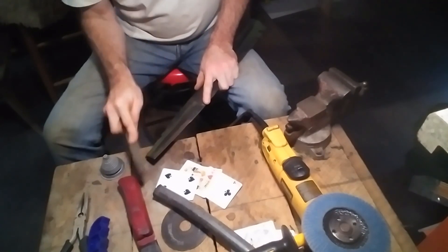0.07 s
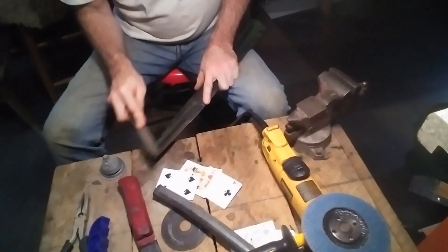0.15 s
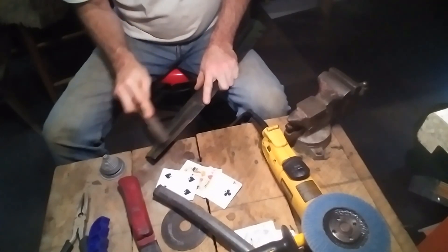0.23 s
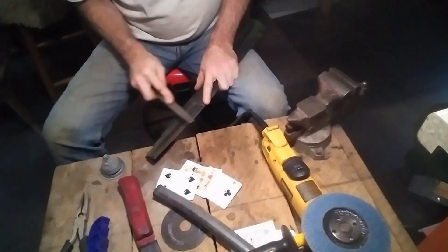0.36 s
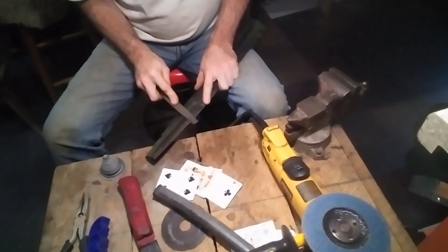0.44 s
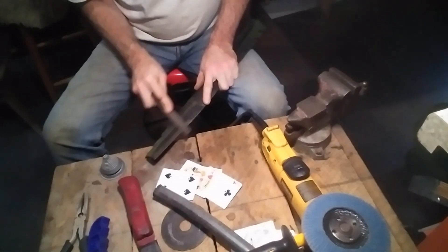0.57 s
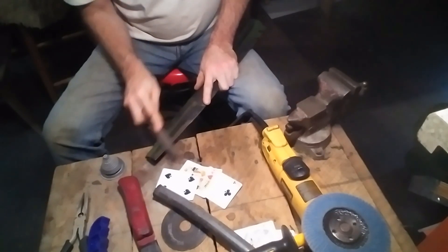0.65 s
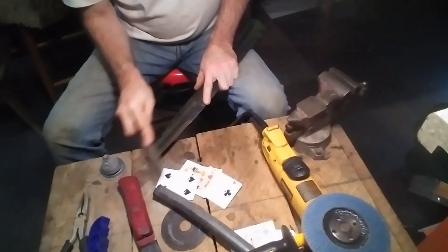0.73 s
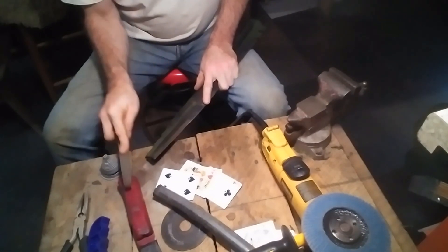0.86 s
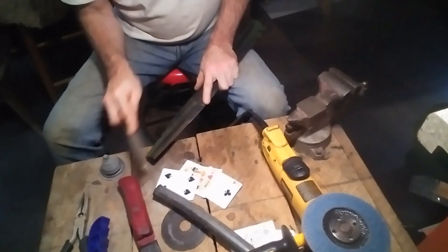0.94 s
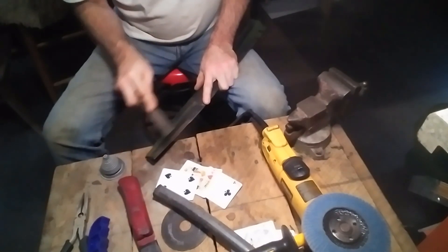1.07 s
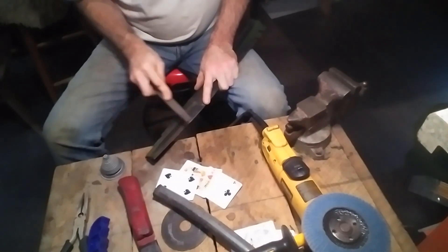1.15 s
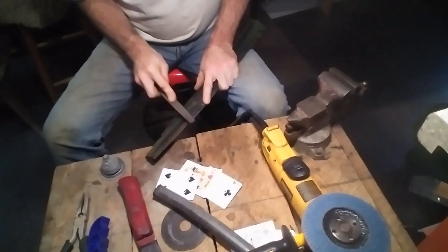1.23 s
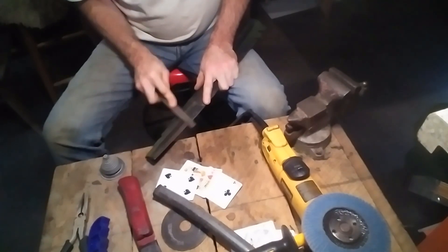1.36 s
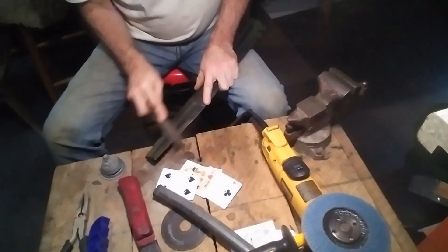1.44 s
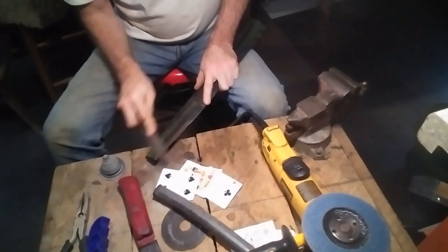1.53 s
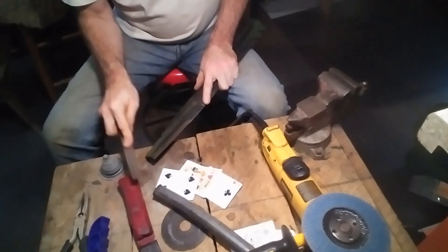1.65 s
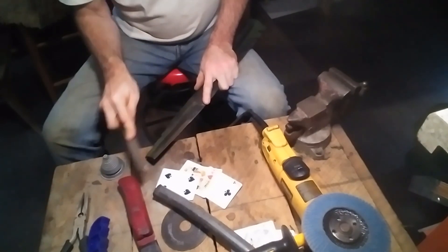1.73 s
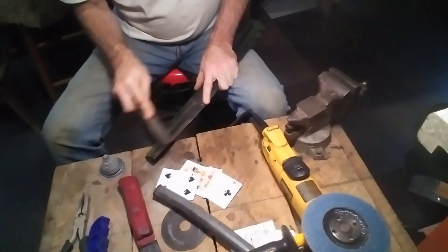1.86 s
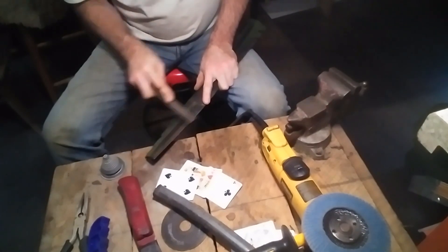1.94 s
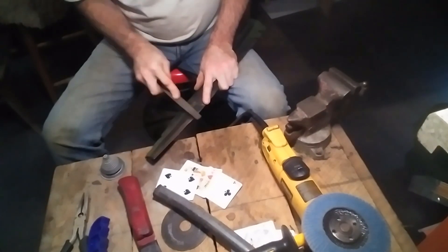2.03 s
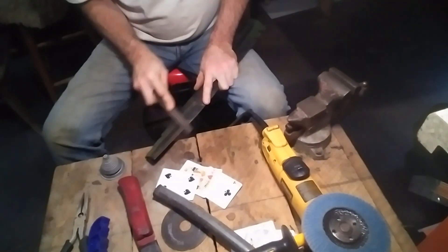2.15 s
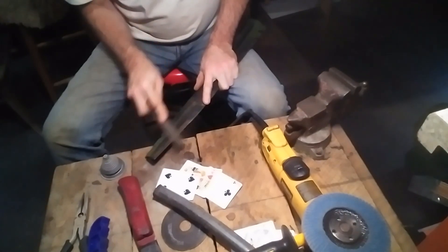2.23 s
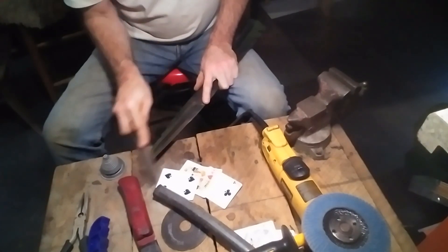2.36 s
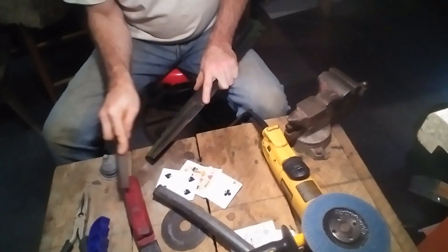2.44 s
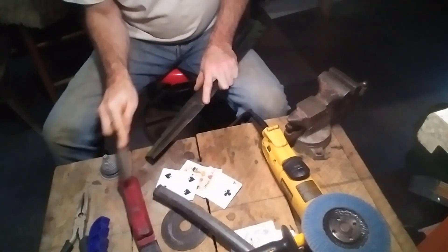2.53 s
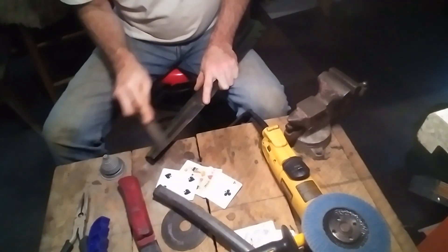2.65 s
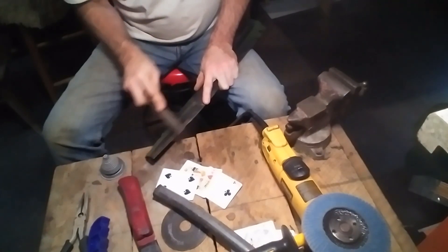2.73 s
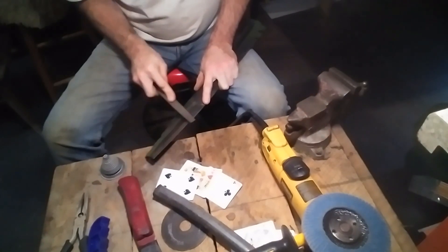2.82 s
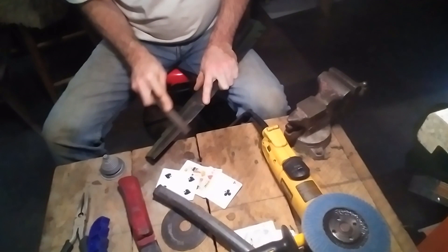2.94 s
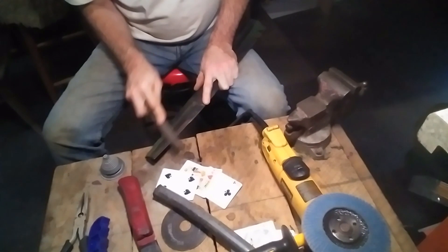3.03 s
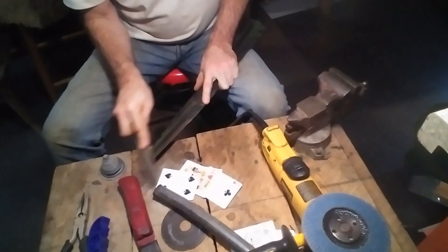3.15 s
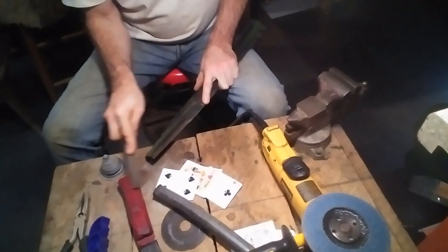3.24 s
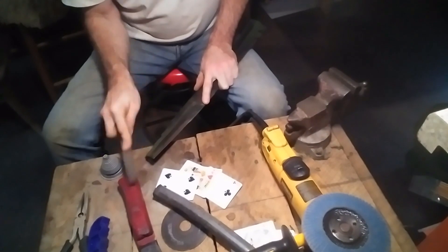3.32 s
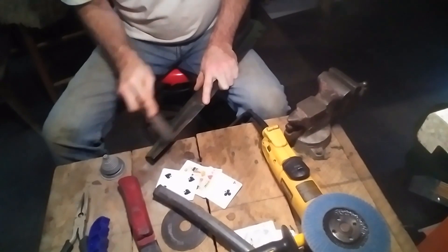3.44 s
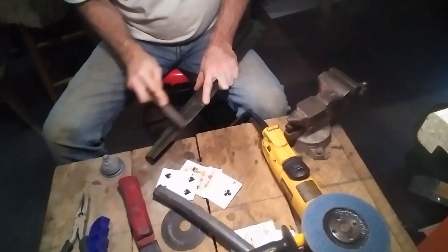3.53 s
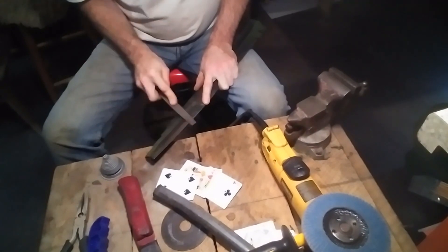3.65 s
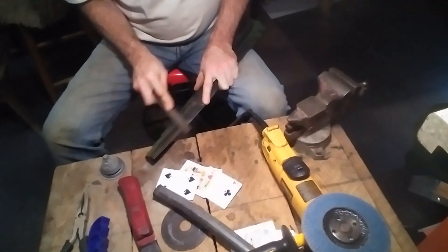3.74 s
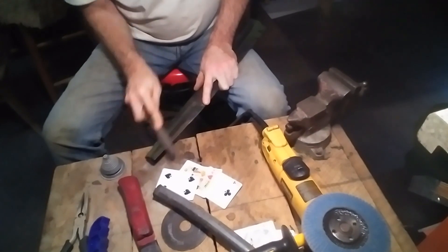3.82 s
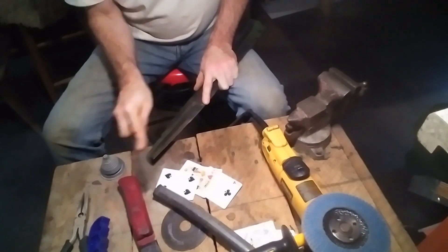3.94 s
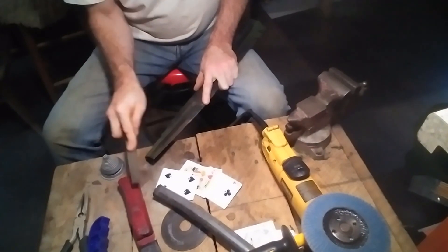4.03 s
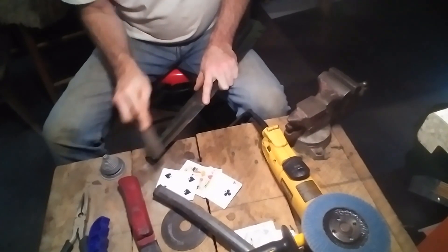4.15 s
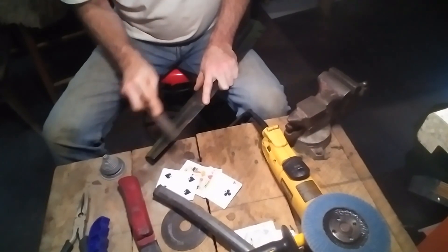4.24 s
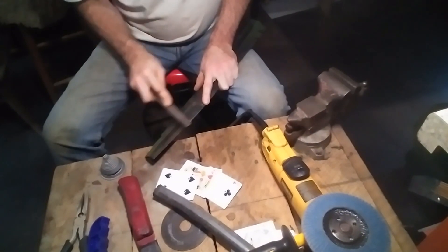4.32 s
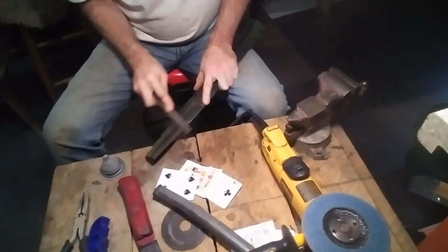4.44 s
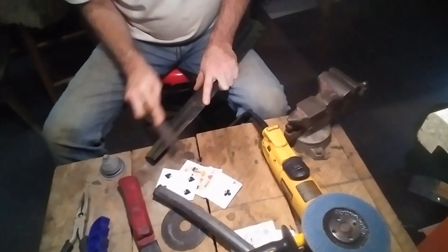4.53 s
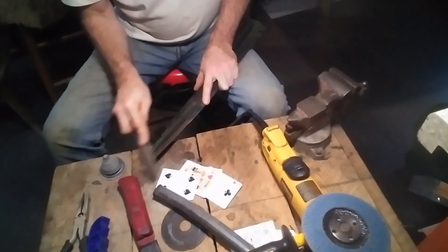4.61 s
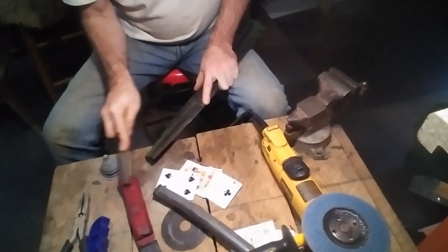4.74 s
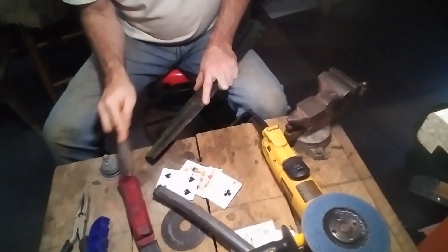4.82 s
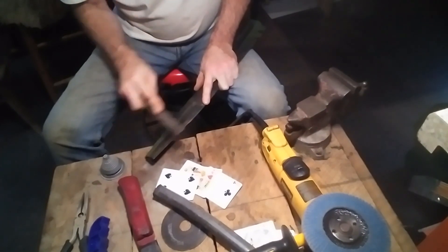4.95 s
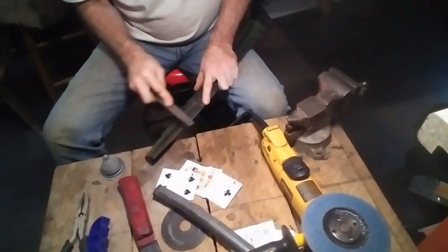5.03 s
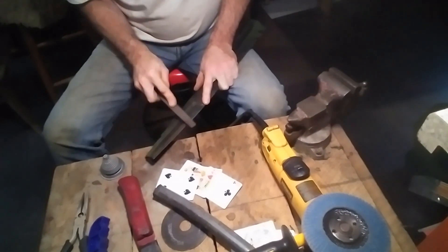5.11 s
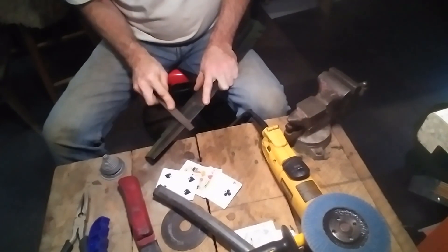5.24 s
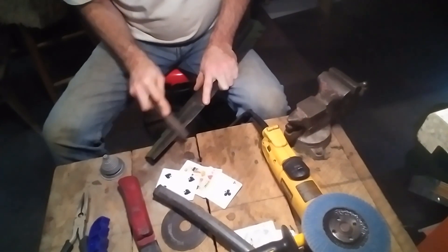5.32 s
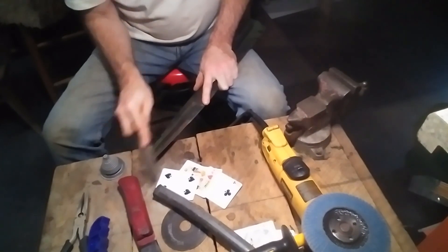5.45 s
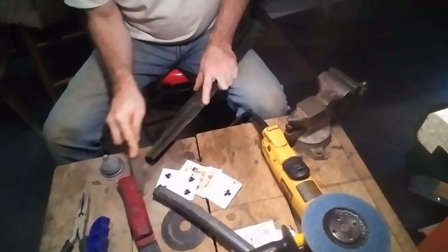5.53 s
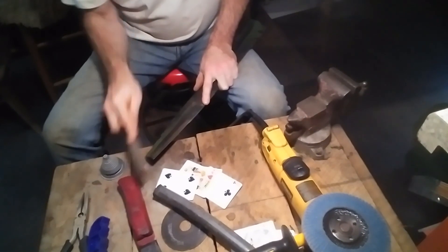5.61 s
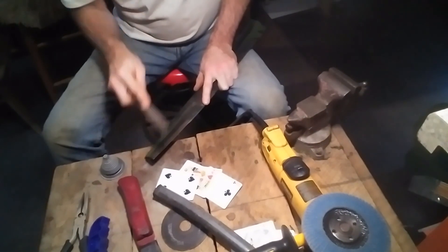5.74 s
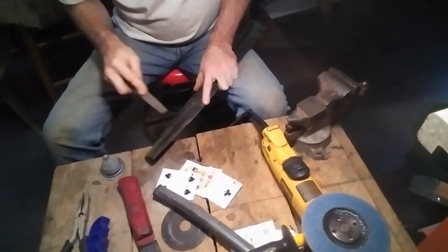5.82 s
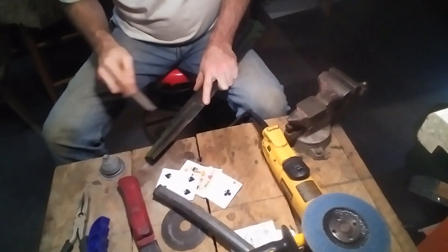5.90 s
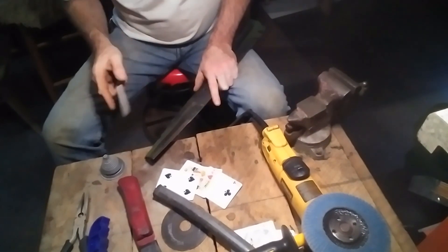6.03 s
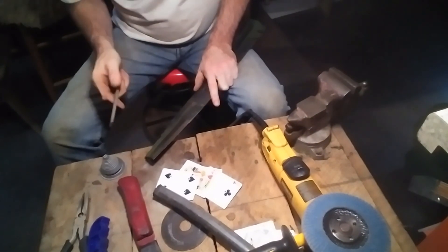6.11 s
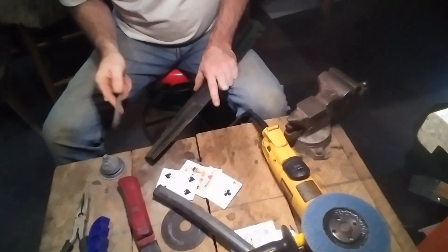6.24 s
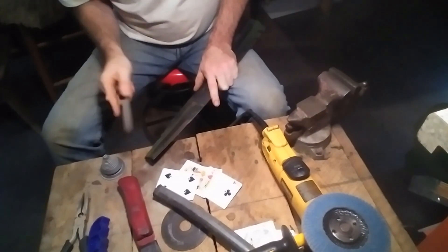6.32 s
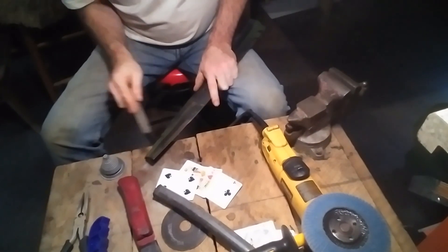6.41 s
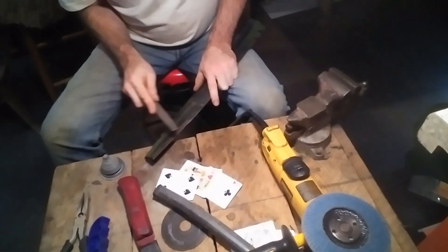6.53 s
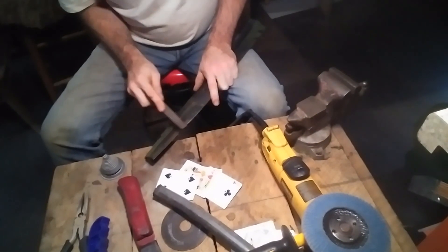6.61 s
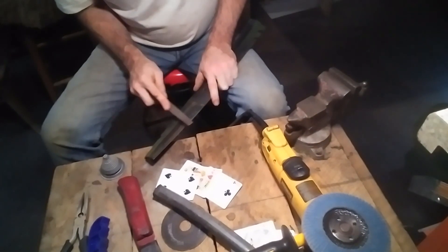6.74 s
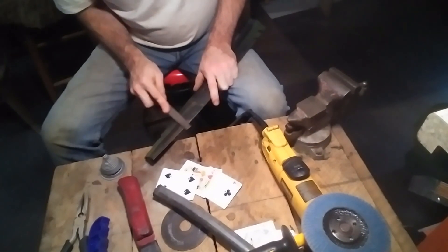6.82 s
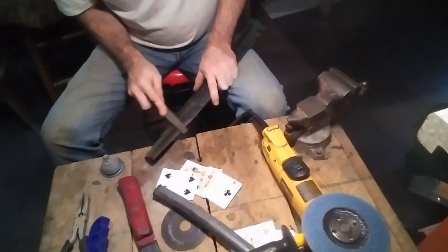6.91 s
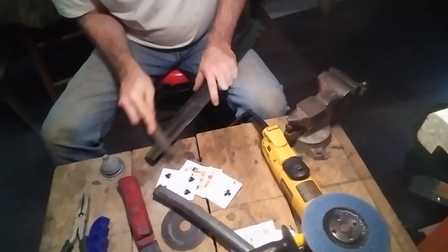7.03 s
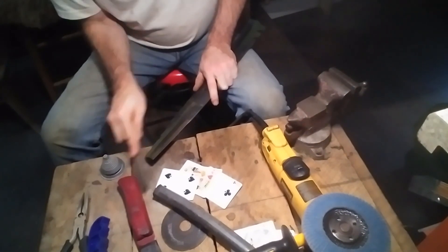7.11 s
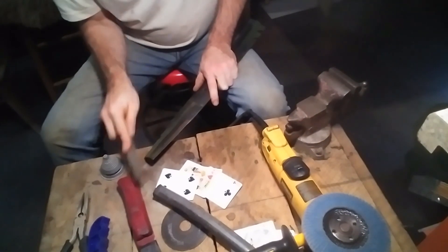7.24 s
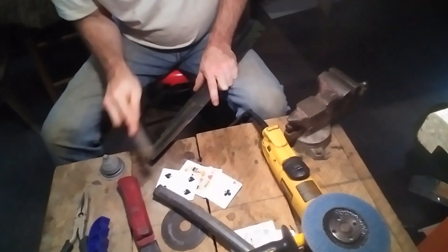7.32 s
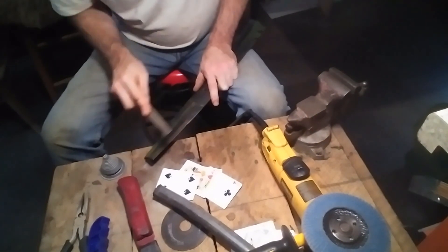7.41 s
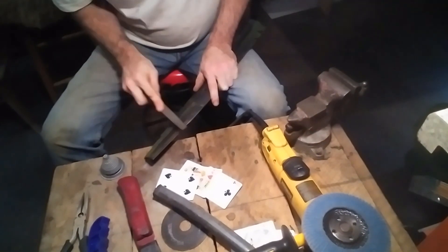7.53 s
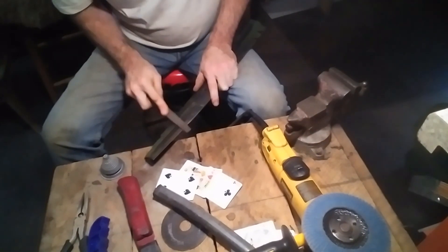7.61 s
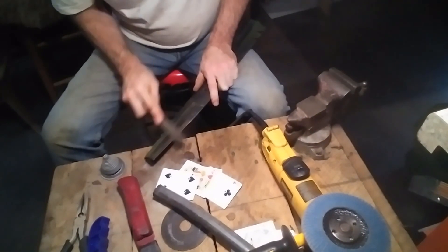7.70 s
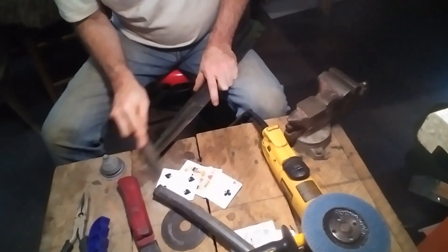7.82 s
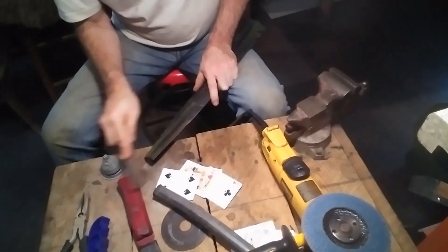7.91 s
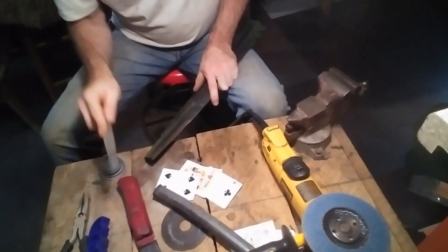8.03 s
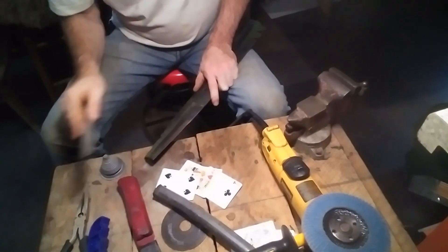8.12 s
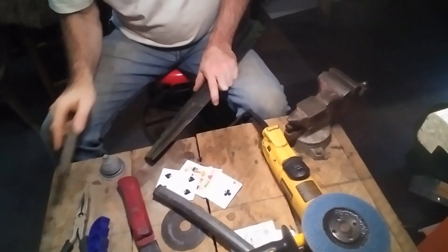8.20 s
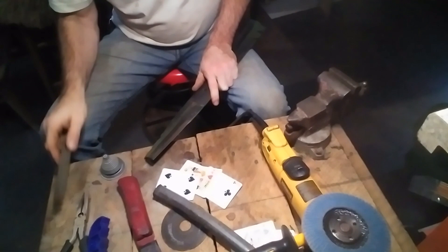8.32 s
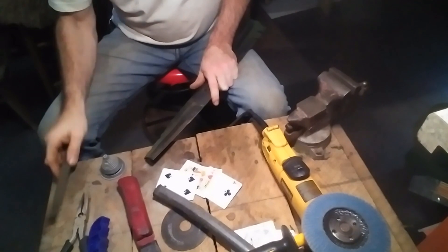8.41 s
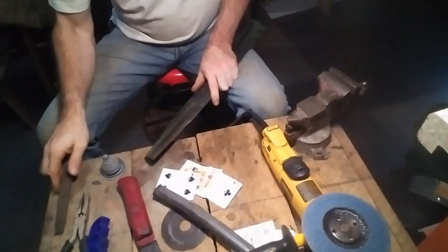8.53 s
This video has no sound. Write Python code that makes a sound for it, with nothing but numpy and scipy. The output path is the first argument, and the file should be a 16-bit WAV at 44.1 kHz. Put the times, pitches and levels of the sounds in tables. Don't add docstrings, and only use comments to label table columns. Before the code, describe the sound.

Short raspy filing strokes on steel clack, buzz and briefly sing, broken by two woody knocks, over faint hum and rustling clothes.

```python
import sys
import numpy as np
from scipy import signal
from scipy.fft import rfft, irfft, next_fast_len
from scipy.io import wavfile
from scipy.ndimage import uniform_filter1d

SR = 44100
rng = np.random.default_rng(int(sys.argv[2]) if len(sys.argv) > 2 else 0)


def decibels_to_gain(level_db):
    exponent = np.asarray(level_db, float) / 20
    return 10 ** exponent


def wav_record(signal):
    frames = np.transpose(np.atleast_2d(signal))
    bounded = np.clip(frames, -1, 1)
    quanta = np.round(bounded * 32767).astype(np.int16)
    wavfile.write(sys.argv[1], SR, quanta)


N = 377665
DITHER = 1e-18 * np.cos(np.arange(N))

# t/s, peak/dB, treble/dB, bass/dB, sizzle/dB
LANDINGS = [
    (0.638, -4, -10, 3.5, 2.5),
    (1.482, -3.5, -2.5, 4, -3.5),
    (2.26, -2, -22, -10, 0),
    (3.074, -3.5, -10, 2, 12.5),
    (3.837, -4, -20.5, 1.5, -7.5),
    (4.583, -1, -5, -1.5, 10.5),
    (5.362, -4.5, -26.5, 5.5, 8),
    (7.007, -5, -5, 6, -12),
    (7.786, -1.5, 0, 6, -18),
]
# t/s, peak/dB, brightness/dB, bite of the teeth/dB
JOLTS = [(0.1444, -0.5, -31, -42), (0.8992, -13, -4, -22.5), (0.9478, -4, 2, -14),
         (1.6328, -24.5, 12.5, -24.5), (1.738, -21, -6, -23), (1.7474, -8, 0.5, -14),
         (1.7666, -6.5, 2.5, -18), (1.7768, -7, 3, -28), (2.341, -19, -3, -31), (2.4, -13, -6, -22),
         (2.558, -14.5, -2, -24), (3.1313, -3, -5, -32), (3.1828, -9, 1.5, -21), (3.2045, -15.5, -0.5, -23),
         (3.2556, -6, -16, -30.5), (3.926, -12, 0, -29.5), (3.9786, -34.5, 14, -20),
         (4.0213, -13.5, 8.5, -25), (4.045, -31, -4, -38), (4.093, -15, 2, -23.5),
         (4.1252, -9.5, -8.5, -22.5), (4.7415, -9.5, 9, -24), (4.791, -25.5, 13, -20.5),
         (4.8379, -11, 2, -20), (5.467, -25.5, 5.5, -25), (5.497, -20.5, -1, -29),
         (5.5731, -14, 8.5, -22.5), (5.649, -22, 7, -20.5), (5.663, -13, -5, -27), (5.674, -5, -5.5, -17.5),
         (5.7205, 0.5, -6, -14), (5.729, -9, -18, -19), (7.0813, -13, -5, -32.5),
         (7.1516, -24.5, -0.5, -37), (7.1626, -11, -1, -44), (7.249, -26, 3, -29.5),
         (7.261, -9.5, -6.5, -22.5), (7.281, -5.5, 2, -33), (7.2973, -4, 3, -28.5),
         (7.306, -8, -10.5, -34.5), (7.3585, 1.5, -7, -13.5), (7.367, -10, -21, -29),
         (7.8756, -15, -3, -25)]
# t/s, peak/dB
SLIPS = [
    (2.575, -17),
    (5.723, -5),
    (7.360, -3),
]
# f/Hz, width/Hz, level/dB
LOW_MODES = [(1308, 45, 1), (1348, 40, 0), (1465, 50, -2), (1600, 60, -5), (1760, 80, -3), (1905, 60, -2),
             (2010, 60, -7), (2350, 70, -9)]
# f/Hz, width/Hz, level/dB
HIGH_MODES = [(2526, 120, -3.5), (3350, 29, -4), (3531, 60, -1.5), (4008, 70, 0), (4370, 110, -9),
              (4740, 210, -11), (5100, 200, -21.5), (5810, 190, -15.5), (6320, 34, -11.5), (6840, 58, -6.5),
              (7377, 55, -2), (8104, 83, -5), (8140, 100, -5), (10180, 270, -22)]
# f/Hz, width/Hz, level/dB
BODY_MODES = [(645, 24, -4), (677.6, 57, -7), (776, 15, -7.5), (894.8, 41, -1.5), (939.4, 73, -5),
              (1060, 54, -6)]
# t/s, level/dB
PRESSURE = [
    [(0.0, -24), (0.06, -29), (0.07, -20.5), (0.136, -27), (0.146, -20), (0.16, -43)],
    [(0.67, -34), (0.696, -37), (0.724, -28.5), (0.956, -23), (0.96, -64)],
    [(1.51, -63), (1.544, -35), (1.638, -25), (1.74, -25), (1.778, -29.5), (1.785, -29)],
    [(2.285, -28.5), (2.293, -29), (2.335, -25), (2.385, -30.5), (2.523, -28), (2.575, -36)],
    [(3.1, -25), (3.113, -33), (3.221, -33), (3.259, -21), (3.263, -28), (3.37, -28.5)],
    [(3.865, -39), (3.873, -42), (3.919, -31), (4.015, -31.5), (4.019, -28), (4.135, -30.5)],
    [(4.61, -34), (4.646, -34.5), (4.728, -26.5), (4.746, -27.5), (4.77, -28.5), (4.845, -28)],
    [(5.39, -43.5), (5.458, -41.5), (5.584, -27), (5.646, -28), (5.674, -17), (5.7, -49)],
    [(7.035, -48), (7.143, -44.5), (7.161, -35.5), (7.253, -25.5), (7.303, -21), (7.345, -34)],
    [(7.813, -34.5), (7.856, -33.5), (7.922, -29.5), (7.938, -27), (8.062, -27.5), (8.065, -27.5)],
]
# start of braking t/s, top speed/(teeth/s), slowest/(teeth/s), at the tip/(teeth/s)
SPEEDS = [(0.03, 1730, 1040, 1700), (0.825, 1890, 1150, 1300), (1.654, 1970, 1150, 1850),
          (2.415, 1650, 1250, 1600), (3.205, 1700, 1180, 1350), (3.984, 1880, 1080, 1420),
          (4.712, 1770, 1200, 1480), (5.506, 1530, 1320, 1400), (7.08, 1910, 1530, 1360),
          (7.93, 1550, 1300, 1700)]
# buzz while fast/dB, buzz while slow/dB, blade body/dB, bench/dB
SHARES = [(3, 0.5, -3, -16), (-1.5, -6, -7.5, -19), (-0.5, -5.5, -17.5, -20), (0, -0.5, -1.5, -17),
          (8.5, 0, -1, -17), (2, -1, -2.5, -19.5), (1.5, -2, -2, -16.5), (5, -3, -8.5, -21),
          (14, 0, -4.5, -17), (1.5, -1, -6, -18.5)]


def rms_one(x):
    return x / np.sqrt(np.mean(x ** 2) + 1e-20)


def passed(x, hz, kind, order=2):
    sections = signal.butter(order, hz, kind, fs=SR, output="sos")
    return signal.sosfilt(sections, x + DITHER[:np.shape(x)[-1]])


def at_hz(points, hz):
    points = np.array(points)
    return np.interp(np.log(hz + 1), np.log(points[:, 0]), points[:, 1])


def colour(x, spectrum):
    cepstrum = irfft(at_hz(spectrum, np.linspace(0, SR / 2, 2049)) * np.log(10) / 20)
    cepstrum[1:2048] *= 2
    cepstrum[2049:] = 0
    kernel = irfft(np.exp(rfft(cepstrum)))
    return signal.oaconvolve(x, kernel / np.sqrt(np.sum(kernel ** 2)))[:N]


def drift(rate, swing_db=None, stepped=False):
    knots_per_s = 200
    knots = rng.standard_normal(int(N / SR * knots_per_s) + 2)
    smooth = rms_one(signal.lfilter([1], [1, -np.exp(-2 * np.pi * rate / knots_per_s)], knots))
    if swing_db is not None:
        smooth = decibels_to_gain(swing_db * smooth)
    if stepped:
        return np.repeat(smooth, SR // knots_per_s + 1)[:N]
    return np.interp(np.arange(N) * (knots_per_s / SR), np.arange(len(knots)), smooth)


def modes(force, table, patchy_db, widen=1):
    out, power = 0, 0
    for k, (hz, width, level_db) in enumerate(table):
        r = np.exp(-np.pi * width * widen / SR)
        drive = force * drift(1.3, patchy_db, stepped=True) + DITHER
        top = np.array([1, 0, -1]) * decibels_to_gain(level_db) * (1 - r * r) / 2
        bottom = [1, -2 * r * np.cos(2 * np.pi * hz / SR), r * r]
        out = out + (-1) ** k * signal.lfilter(top, bottom, drive)
        power += decibels_to_gain(level_db) ** 2 * (1 - r * r) / 2
    return out / np.sqrt(power)


def grains(per_s, spread_db):
    sizes = decibels_to_gain(spread_db * np.minimum(rng.exponential(1, N), 5)) * np.sign(rng.random(N) - .5)
    return rms_one(sizes * (rng.random(N) < per_s / SR))


def bursts(events, rise_s, fall_s, column=None):
    t, out = np.arange(round(.04 * SR)) / SR, np.zeros(N)
    shape = (1 - np.exp(-t / rise_s)) * np.exp(-t / fall_s)
    for row, noise in zip(events, rng.standard_normal((len(events), len(t)))):
        i = round(row[0] * SR)
        trim_db = row[column] if column else 0
        out[i:i + len(t)] += decibels_to_gain(row[1] + trim_db) * shape * noise
    return out


def blows(events, column=None, late_s=0):
    out = np.zeros(N)
    for row in events:
        trim_db = row[column] if column else 0
        out[round((row[0] + late_s) * SR)] = decibels_to_gain(row[1] + trim_db)
    return out


def swells(events, column, rise_s, fall_s):
    marks, t = np.zeros(N), np.arange(round(.1 * SR)) / SR
    for row in events:
        marks[round(row[0] * SR)] = decibels_to_gain(row[column])
    return signal.oaconvolve(marks, (1 - np.exp(-t / rise_s)) * np.exp(-t / fall_s))[:N]


def pressure_db(off_db):
    edge_s, points = .025, []
    for stroke in PRESSURE:
        points.append((stroke[0][0] - edge_s, off_db))
        points += [(row[0], row[1]) for row in stroke]
        points.append((stroke[-1][0] + edge_s, off_db))
    return np.interp(np.arange(N) / SR, *np.transpose(points))


def stroke_corners():
    brake_s = 0.055
    return np.array([(stroke[0][0], speed[0], speed[0] + brake_s, stroke[-1][0])
                     for stroke, speed in zip(PRESSURE, SPEEDS)])


def since_touch():
    early_s = .05
    t, starts = np.arange(N) / SR, stroke_corners()[:, 0] - early_s
    starts[0] = -1
    return np.maximum(t - starts[np.searchsorted(starts, t) - 1] - early_s, 0)


def fast_then_slow(fast, slow, tip):
    values = np.transpose([fast, fast, slow, tip])
    return np.interp(np.arange(N) / SR, stroke_corners().ravel(), values.ravel())


def tooth_rate():
    start_teeth_per_s, speed_up_s = 1050, .035
    _, top, slowest, tip = np.transpose(SPEEDS)
    cruise = fast_then_slow(top, slowest, tip)
    return cruise + (start_teeth_per_s - cruise) * np.exp(-since_touch() / speed_up_s)


def pressed(fast_db, slow_db):
    return decibels_to_gain(pressure_db(off_db=-93.5) + fast_then_slow(fast_db, slow_db, slow_db))


def shaken(share_db, fast_db, landing_db, landing_s, jolt_db):
    slip_db = -19
    steady = pressed(share_db + fast_db, share_db)
    landing = decibels_to_gain(landing_db) * swells(LANDINGS, column=1, rise_s=0.0036, fall_s=landing_s)
    jolt = decibels_to_gain(jolt_db) * swells(JOLTS, column=3, rise_s=0.014, fall_s=0.016)
    slip = decibels_to_gain(jolt_db + slip_db) * swells(SLIPS, column=1, rise_s=0.0015, fall_s=0.0083)
    return steady + landing + jolt + slip


def rustle():
    swishes = [(.28, -77, .1, .1), (.508, -58.5, .1, 0.11), (.63, -60, 0.063, 0.081),
               (1.129, -60, 0.15, 0.071), (1.398, -57, 0.017, 0.96), (2.038, -59, 0.35, 0.11),
               (2.249, -69, 0.025, 0.092), (2.759, -57, 0.38, 0.16), (3.008, -60.5, 0.047, 0.34),
               (3.49, -61, 0.14, 0.25), (3.626, -64, 0.36, 0.086), (3.829, -53, 0.16, 0.084),
               (4.45, -56, 0.17, 0.38), (5.074, -54, 0.069, 0.2), (5.3, -55.5, 0.36, 0.98),
               (5.989, -78, 0.11, .25), (6.094, -58.5, 0.022, 0.18), (6.244, -64, 0.47, 0.083),
               (6.351, -59.5, 0.035, 0.1), (6.47, -58.5, 0.02, 0.39), (6.636, -81, 0.24, 0.087),
               (6.792, -56.5, 0.15, 0.29), (7.001, -63, 0.048, 0.064), (7.58, -59, 0.082, 0.11),
               (7.712, -62.5, 0.33, 0.028), (7.781, -46, 0.045, 0.047), (8.36, -65.5, 0.037, .4),
               (8.5, -62.5, 0.13, 0.64)]
    t = np.arange(0, N / SR + .01, .002)
    gain = decibels_to_gain(-85)
    for s, db, swell, fade in swishes:
        gain = gain + decibels_to_gain(db - 25 * np.maximum((s - t) / swell, (t - s) / fade))
    return np.interp(np.arange(N) / SR, t, gain)


def background():
    # f/Hz, level/dB (per Hz)
    hum_colour = [(15, -36.5), (25, -10), (102, 3), (217, -5.5), (373, 3.5), (476, -6), (560, -5.5),
                  (2350, -15), (3920, -19), (5000, -31.5), (6740, -23), (14800, -24), (16000, -30.5)]
    # f/Hz, level/dB (per Hz)
    cloth_colour = [(88, -49.5), (150, -11), (270, -6.5), (345, -5.5), (516, -10.5), (832, -12),
                    (1750, -21), (5140, -38.5), (6000, -39.5), (7800, -65.5), (13200, -120)]
    # t/s, peak/dB
    ticks = [
        (1.396, -46),
        (1.454, -51),
        (3.8, -52),
        (6.093, -58),
        (6.465, -57),
        (6.756, -64),
        (7.755, -43),
    ]
    hum = decibels_to_gain(-64) * colour(rng.standard_normal(N), hum_colour)
    swish = grains(6400, spread_db=2.5) * rustle() * decibels_to_gain(2.0 * drift(15))
    snaps = decibels_to_gain(-6.5) * passed(bursts(ticks, .0003, 0.008), 350, "high")
    snaps = passed(snaps, 4200, "low", order=4)
    return passed(hum, 46, "high", order=4) + colour(swish, cloth_colour) + snaps


def grit():
    # f/Hz, level/dB (per Hz)
    rasp_colour = [(1120, -28), (1900, -2.5), (2170, -11), (2760, 1.5), (3050, -13), (3880, -2), (4130, -9),
                   (4280, -3), (4900, -9), (7430, -8.5), (9540, -18), (13400, -41), (16000, -35.5)]
    edges_hz = np.geomspace(1500, 16500, 10)
    force = grains(16000, spread_db=2.0) * decibels_to_gain(pressure_db(off_db=-89.0) - 0.43 + 2.0 * drift(30))
    hiss, mottled = colour(force, rasp_colour), 0
    for low, high in zip(edges_hz, edges_hz[1:]):
        mottled = mottled + passed(hiss, [low, high], "band") * drift(7.9, swing_db=2.0, stepped=True)
    return decibels_to_gain(-1.0) * mottled + decibels_to_gain(-6.5) * modes(force, HIGH_MODES, patchy_db=3.0, widen=2)


def teeth():
    rate = tooth_rate() * (1 + .08 * drift(120))
    turns = np.cumsum(rate) / SR
    push = np.cos(2 * np.pi * turns) * decibels_to_gain(2.5 * drift(70))
    wear = rms_one(passed(rng.standard_normal(N), 380, "low"))
    uneven = wear * np.sin(2 * np.pi * turns)
    rough = 1.6 * grains(6000, spread_db=2.0) + 1.2 * uneven
    ringing = modes(push + rough, LOW_MODES, patchy_db=7.5, widen=1.4)
    sound = ringing + decibels_to_gain(1.5) * (push + .6 * uneven)
    even = np.sqrt(uniform_filter1d(sound ** 2, size=1500) + 1e-12)
    fast_db, slow_db, _, _ = np.transpose(SHARES)
    catch = decibels_to_gain(-8.5 * np.exp(-since_touch() / 0.032) - 4.0)
    bite = swells(JOLTS, column=3, rise_s=0.0013, fall_s=0.0036)
    return sound / even * (catch * pressed(fast_db, slow_db) + bite)


def rumble():
    # f/Hz, width/Hz, level/dB
    bench_modes = [(165, 24, -3.5), (255, 74, -6), (320, 87, -1), (432, 64, -2.5), (558, 76, -0.5)]
    shake = rng.standard_normal(N) * decibels_to_gain(-0.5 + 2.0 * drift(14))
    _, _, body_db, bench_db = np.transpose(SHARES)
    bench_gain = shaken(bench_db, fast_db=-4, landing_db=-29.5, landing_s=0.018, jolt_db=-19.5)
    body_gain = shaken(body_db, fast_db=-7, landing_db=-23, landing_s=0.018, jolt_db=-9.5)
    bench = modes(shake * bench_gain, bench_modes, patchy_db=2.5)
    body = modes(shake * body_gain, BODY_MODES, patchy_db=1.2, widen=1.5)
    return passed(bench, 1200, "low") + passed(body, 1500, "low")


def clacks():
    # f/Hz, level/dB (per Hz)
    crack_colour = [(120, -45.5), (200, -12.5), (1680, -3.5), (3250, -2.5), (3900, 1.5), (4860, -17),
                    (5730, -4), (6880, -17.5), (7540, -9.5), (9580, -25), (16000, -40)]
    # clang/dB, bounce after/s, bounce/dB
    rebounds = [(15.5, 0.0031, -4.5), (5.5, .006, -6.5), (-20, .007, -6), (-4.5, 0.0071, -2.5),
                (-5, 0.0041, 0), (1, 0.0034, -7), (-2.5, 0.0063, -7), (-17.5, .004, -3.5), (17, 0.003, -2)]
    jolts = [(s, db, bright, -0.5, 2.3 * bright, bright - 2.5) for s, db, bright, _ in JOLTS]
    first = [row + (clang_db,) for row, (clang_db, _, _) in zip(LANDINGS, rebounds)]
    second = [(row[0] + after, row[1] + db) + row[2:] for row, (_, after, db) in zip(first, rebounds)]

    def force(column=None):
        landing = bursts(first, 0.0003, 0.0026, column) + bursts(second, 0.0007, 0.0027, column)
        return decibels_to_gain(-8.5) * landing + decibels_to_gain(-16.0) * bursts(jolts, 0.0012, 0.0046, column)

    crack = passed(colour(force(), crack_colour), 5300, "low")
    clang = decibels_to_gain(-9.0) * passed(force(column=5), [3400, 4450], "band")
    sizzle = passed(colour(force(column=4), crack_colour), 6900, "high")
    high = modes(force(column=2), HIGH_MODES, patchy_db=2, widen=3.5)
    low = modes(force(column=3), LOW_MODES + BODY_MODES, patchy_db=1.5, widen=1.6)
    struck = crack + decibels_to_gain(-2.5) * passed(low, 6700, "low")
    struck = signal.lfilter(*signal.iirnotch(1155, 4.0, fs=SR), struck)
    return struck + clang + sizzle + high


def chatter():
    # t/s, length/s, f/Hz, level/dB
    songs = [(0.742, 0.051, 1940, -31.5), (1.617, 0.043, 1904, -39), (1.68, 0.1, 167, -48.5),
             (2.333, 0.053, 1817, -29), (2.365, 0.051, 1453, -32), (2.395, 0.03, 1940, -29),
             (3.102, 0.099, 165, -58.5), (3.189, 0.023, 1864, -27.5), (3.26, 0.047, 1006, -25.5),
             (3.922, 0.023, 1790, -31), (3.95, .11, 162, -54), (3.966, 0.014, 1910, -26),
             (4.04, 0.013, 1337, -25), (4.121, 0.011, 1410, -27), (4.688, 0.043, 1898, -28.5),
             (5.658, 0.028, 1425, -24), (7.251, 0.039, 1332, -21.5), (7.286, .03, 1358, -15),
             (7.323, .024, 1329, -24.5)]
    out, throb, waver = np.zeros(N), drift(40, swing_db=2.0), 1 + .02 * drift(60)
    for s, length, hz, db in songs:
        t = np.arange(round(length * SR)) / SR
        start = round(s * SR)
        part = slice(start, start + len(t))
        edges = np.clip(np.minimum(t, length - t) / 0.0029, 0, 1)
        tone = np.sin(2 * np.pi * hz * np.cumsum(waver[part]) / SR)
        out[part] += decibels_to_gain(db) * edges * throb[part] * tone
    return out


def knocks():
    # f/Hz, width/Hz, level/dB
    spring_modes = [(500, 40, -3), (1000, 80, -8), (1790, 70, -5), (2580, 26, 0), (2750, 24, -3)]
    # t/s, peak/dB, ring of the file/dB
    bench_hits = [
        (5.831, -11.5, 4),
        (7.451, -18, -6.5),
    ]
    # f/Hz, level/dB (per Hz)
    thud_colour = [(71, -39.5), (120, -11), (309, -6), (485, -6.5), (557, -6.5), (647, -20), (806, -11),
                   (974, -23), (1300, -20), (1690, -29), (2860, -120)]
    # f/Hz, width/Hz, level/dB
    plank_modes = [(167.6, 27, -2), (247, 45, -8.5), (327, 36, -3.5), (420, 40, -2), (569, 65, -8),
                   (793, 80, -16.5)]
    # f/Hz, width/Hz, level/dB
    file_modes = [(1150, 60, -12), (1510, 50, -9), (1880, 62, 0), (2730, 80, -8), (3060, 90, -9)]
    spring = decibels_to_gain(9.0) * modes(blows(SLIPS), spring_modes, patchy_db=-0.5)
    thud = decibels_to_gain(-8.5) * colour(bursts(bench_hits, 0.001, 0.024), thud_colour)
    planks = decibels_to_gain(13.0) * modes(blows(bench_hits, late_s=.001), plank_modes, patchy_db=3.5)
    ring_force = passed(blows(bench_hits, column=2, late_s=.003), 3600, "low")
    ring = decibels_to_gain(6.0) * modes(ring_force, file_modes, patchy_db=2)
    return spring + thud + planks + ring


def workshop(x):
    # f/Hz, time/s
    fade_times = [(200, 0.45), (530, 0.28), (1400, 0.26), (9700, 0.24)]
    t, tails, out = np.arange(round(.5 * SR)) / SR, 0, 0
    for low in 90 * 2. ** np.arange(8):
        band = passed(rng.standard_normal((4, len(t))), [low, min(2 * low, .45 * SR)], "band")
        tails = tails + band * decibels_to_gain(-60 * t / at_hz(fade_times, 1.4 * low))
    tails = tails * np.clip((t - .004) / 0.0016, 0, 1)
    turn = np.arange(N) / SR / .07
    size = next_fast_len(N + len(t), True)
    for k, tail in enumerate(tails):
        share = np.cos(np.pi / 2 * np.clip((turn - k + 2) % 4 - 2, -1, 1))
        out = out + rfft(x * share, size) * rfft(tail / np.sqrt(np.sum(tail ** 2)), size)
    return irfft(out, size)[:N]


def scene():
    quiet = background()
    work = grit() + teeth() + rumble() + clacks()
    singing, knocking = chatter(), knocks()
    work, knocking = passed([work, knocking], 125, "high", order=4)
    echoes = workshop(work + decibels_to_gain(-8) * knocking + decibels_to_gain(-6.5) * singing)
    return (work + knocking + singing + decibels_to_gain(-5.5) * echoes + quiet)[None]


def band_limit(x):
    return signal.sosfilt(signal.butter(12, 16540, fs=SR, output="sos"), x)


def record(dry):
    top = signal.cheby2(14, 70, 16450, fs=SR, output="sos")
    mix = signal.sosfilt(top, dry)
    return band_limit(mix)


dry = scene()
out = record(dry)
wav_record(out)
```